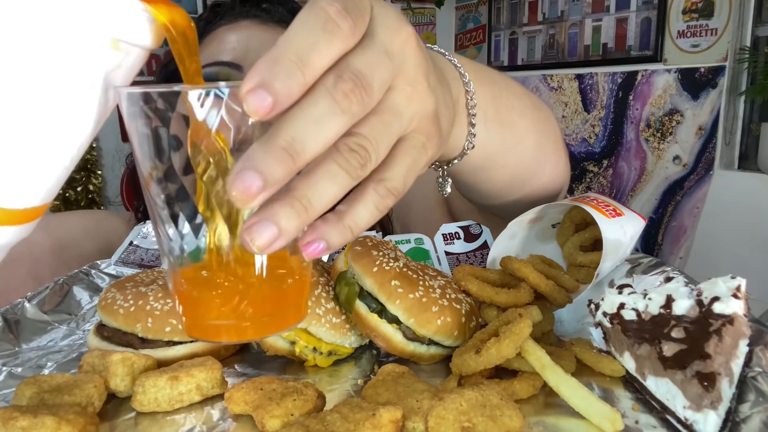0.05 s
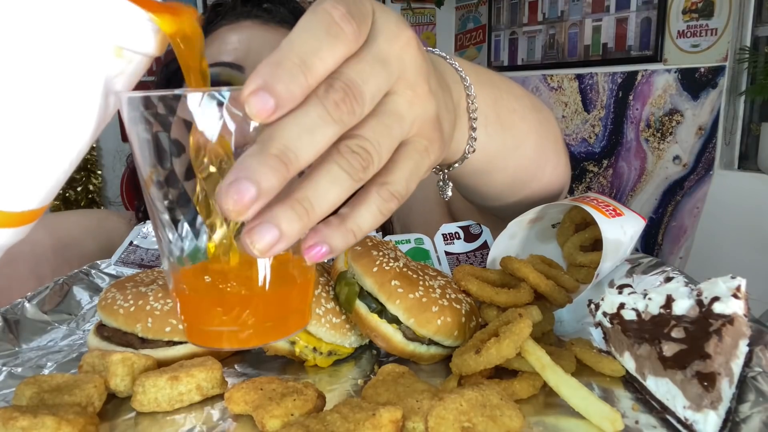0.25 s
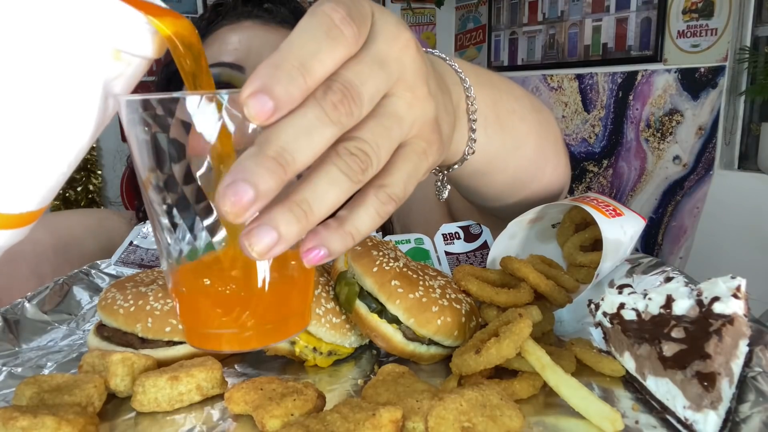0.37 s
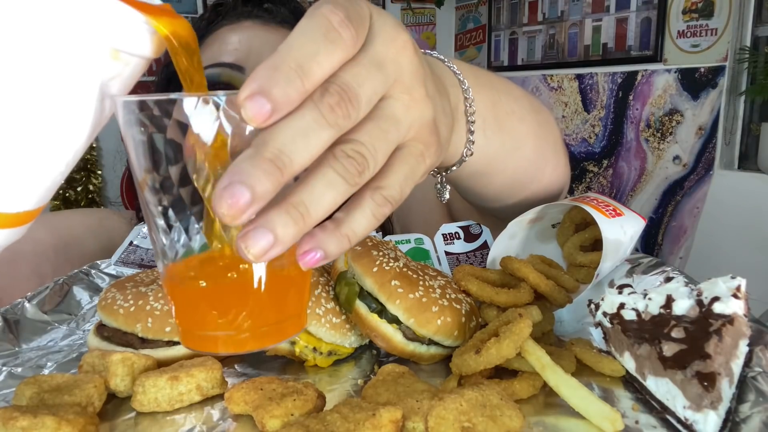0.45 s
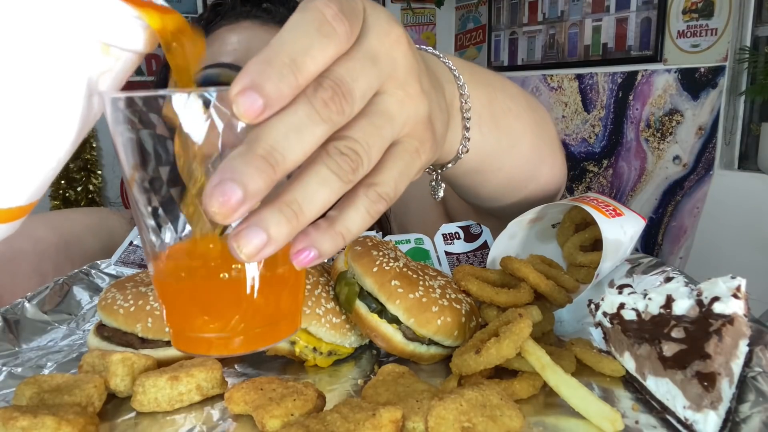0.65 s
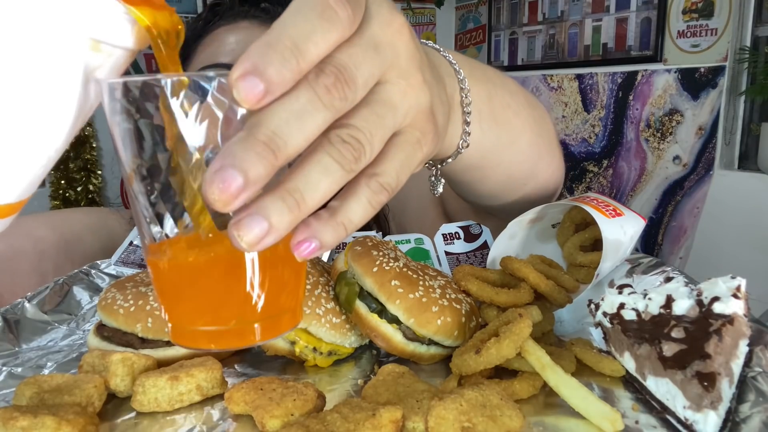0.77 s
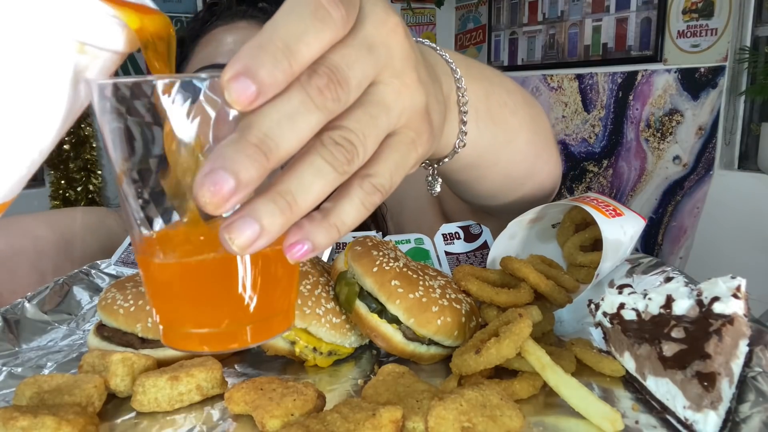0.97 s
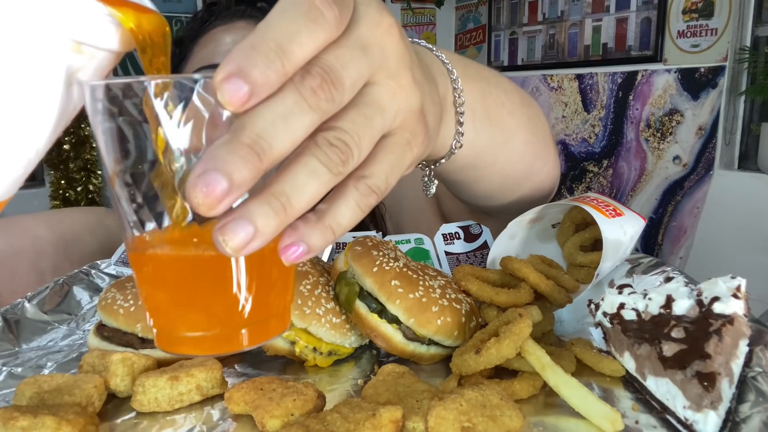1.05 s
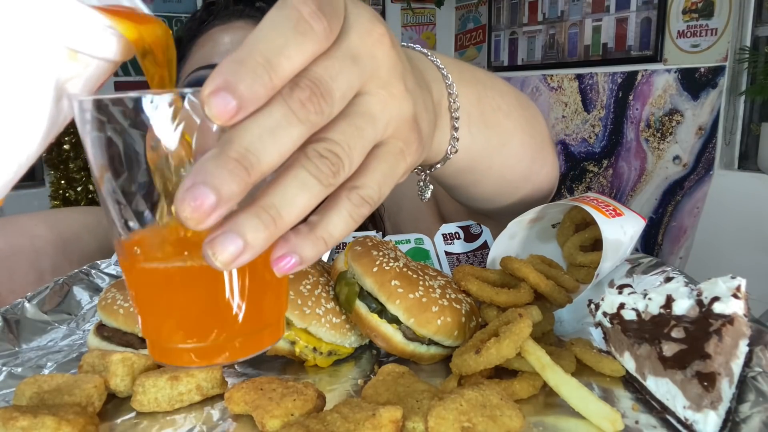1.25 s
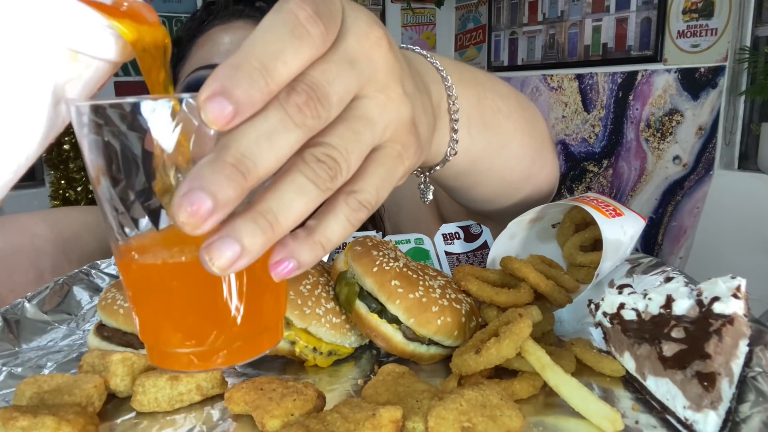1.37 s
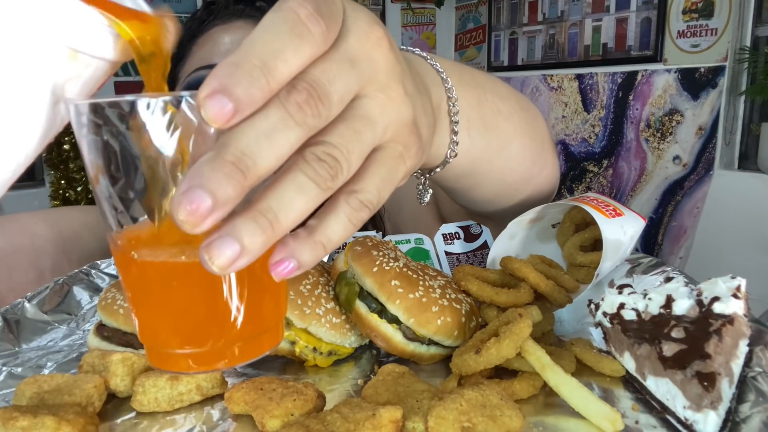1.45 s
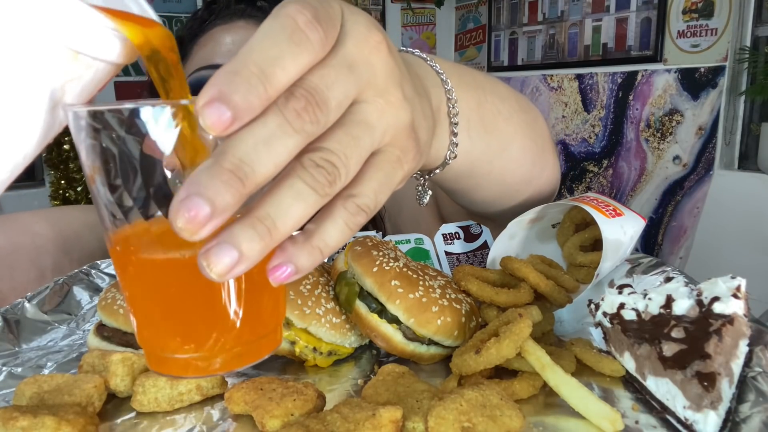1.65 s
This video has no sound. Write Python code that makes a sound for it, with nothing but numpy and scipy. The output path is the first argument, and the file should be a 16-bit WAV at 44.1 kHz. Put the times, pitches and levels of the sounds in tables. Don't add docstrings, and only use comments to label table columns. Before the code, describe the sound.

Soda streams into a plastic cup very close to the microphones: light crackles first, sharp bubbly splats, a hollow glug, then sparser drips and fading fizz, with a quiet motor drone in a small room.

```python
import sys
import numpy as np
from scipy import signal
from scipy.fft import rfft, irfft
from scipy.io import wavfile
from scipy.ndimage import uniform_filter1d

SR = 44100
rng = np.random.default_rng(int(sys.argv[2]) if len(sys.argv) > 2 else 0)


def unload_audio(sound):
    columns = np.transpose(np.atleast_2d(sound))
    steps = np.round(np.clip(columns, -1, 1) * 32767)
    wavfile.write(sys.argv[1], SR, steps.astype(np.int16))


def makeup_ratio(level_db):
    decades = np.asarray(level_db, float) / 20
    return 10 ** decades


N = 74970


def evened(x):
    return x / np.sqrt(np.mean(x ** 2) + 1e-20)


def read(points, hz):
    f, value = np.transpose(points)
    return np.interp(np.log(hz + 1), np.log(f + 1), value)


def add(mix, start_s, sound):
    part = mix[max(round(start_s * SR), 0):][:len(sound)]
    part += sound[:len(part)]


def coloured(x, points, size=4096):
    log_gain = np.log(makeup_ratio(read(points, abs(np.fft.fftfreq(size, 1 / SR)))))
    taps = np.fft.ifft(np.exp(np.conj(signal.hilbert(log_gain)))).real
    return signal.oaconvolve(x, taps[:size // 2])[:len(x)]


def resonate(x, hz, width):
    turn = np.exp(2j * np.pi * np.cumsum(hz * np.ones(len(x))) / SR)
    r = np.exp(-np.pi * width / SR)
    return 2 * (turn * signal.lfilter([1 - r], [1, -r], x / turn + 1e-18)).real


def splats():
    # (time [s], level [dB], ring pitch [Hz], treble [dB])
    lumps = [(0.0014, -25, 6000, -6), (0.064, -31, 3260, -9.5), (0.077, -28, 6900, -7.5),
             (0.098, -20, 3390, -13), (0.1361, -23.5, 4800, -12.5), (0.179, -25.5, 3330, -20),
             (0.218, -37, 3170, -1), (0.2276, -20, 6030, -9), (0.2425, -18.5, 5860, -7),
             (0.2666, -20.5, 3400, -10), (0.3007, -13.5, 1660, -4.5), (0.3048, -17, 4860, -10),
             (0.3077, -10, 3000, -7.5), (0.3319, -22, 2240, 0), (0.348, -20.5, 3700, -9),
             (0.409, -22, 6360, -4.5), (0.441, -16, 4000, -9.5), (0.4703, -19.5, 3430, -12),
             (0.5432, -21, 3310, -20.5),
             (0.5944, -23, 1730, -10), (0.613, -21.5, 3500, -13.5), (0.6648, -37.5, 1770, 3.5),
              (0.6976, -8, 2730, -12), (0.7104, -30, 1660, -21), (0.717, -32, 2580, 5.5),
              (0.7474, -30, 3330, -6), (0.7753, -20.5, 7060, -32), (0.786, -23.5, 2440, -15),
              (0.8021, -21.5, 3400, -17), (0.847, -14.5, 3700, -8), (0.8837, -27, 2250, -9),
              (0.9207, -32.5, 3320, -11), (0.9429, -26.5, 3500, -21), (0.9517, -29.5, 1410, -8),
              (0.9613, -29, 3160, -4.5), (0.978, -37, 3420, -12.5), (0.9976, -16.5, 7400, -9.5),
              (1.003, -25, 3760, -29), (1.0258, -24.5, 3400, -9),
             (1.0433, -32.5, 4030, -9), (1.1026, -28.5, 3670, -19), (1.1085, -36.5, 3500, -35),
            (1.127, -22.5, 6770, -6.5), (1.2025, -28, 2840, -19), (1.2287, -32.5, 3020, -8),
            (1.256, -34, 3080, -16), (1.3087, -13, 5260, -7), (1.354, -21, 4900, -15),
            (1.3757, -26.5, 6700, -1), (1.3987, -23.5, 1650, -7), (1.4226, -22, 6300, -11),
            (1.4728, -31, 3020, -15), (1.5074, -24, 2890, -9.5), (1.5759, -26.5, 3000, -17),
            (1.6007, -29, 3000, -15.5), (1.6109, -28, 2940, -17), (1.6954, -29.5, 2920, -35)]
    # (frequency [Hz], level [dB])
    body_colour = [(300, -51), (800, -6), (1500, -3.5), (3000, -3.5), (6000, -4.5), (8000, -14),
                   (11000, -24.5)]
    treble_colour = [(4000, -40.5), (7600, -2), (9400, -4), (11300, -13), (13500, -19), (15200, -17.5),
                     (16500, -35)]
    lead_s, rise_s, body_lag_s = 0.002, 0.0009, 0.001197
    crackle_db, patch_db = 5.27, 2.2
    ring_q, ring_db = 9, -7.5
    low_edge = 0.45

    body, treble, rings = np.zeros((3, N))
    t = np.arange(1800) / SR
    f = np.fft.rfftfreq(len(t), 1 / SR)
    rise = 1 - np.exp(-((t - lead_s).clip(0) / rise_s) ** 2)
    for s, db, hz, treble_db in lumps:
        length_s = 0.0051 * makeup_ratio(0.011 * (db + 27))
        shape = rise * (np.exp(-((t - lead_s) / length_s) ** 2) + 0.16 * np.exp(-t / 0.015))
        noise = rng.standard_normal((2, len(t)))
        flicker = uniform_filter1d(rng.standard_normal((2, len(t))), size=9) * 4.04
        bursts = noise * makeup_ratio(crackle_db * flicker) * shape
        patches = uniform_filter1d(rng.standard_normal((2, len(f))), size=25) * 5
        low_cut = np.sqrt(1 + (low_edge * hz / (f + 1)) ** 4)
        bursts = irfft(rfft(bursts) * makeup_ratio(patch_db * patches) / low_cut, len(t))
        low, high = (evened(burst) * np.sqrt(np.mean(shape ** 2)) for burst in bursts)

        start_s = s - lead_s
        add(treble, start_s, makeup_ratio(db + treble_db) * high)
        add(body, start_s + body_lag_s, makeup_ratio(db - 6.5) * low)
        ring = resonate(resonate(low, hz, hz / ring_q), hz, hz / 2)
        add(rings, start_s + body_lag_s, makeup_ratio(db - 12 + ring_db) * ring * np.std(low) / np.std(ring))
    return 2.13 * coloured(body, body_colour) + 3.92 * coloured(treble, treble_colour) + rings


def plops():
    # (time [s], level [dB], pitch [Hz], t60 [s])
    air_plops = [(0.003, -47.5, 798, 0.12), (0.101, -39.5, 1008, 0.069), (0.324, -31.5, 885, 0.065),
                 (0.573, -35, 1029, 0.075), (0.666, -34, 1020, 0.054), (0.7, -19, 1070, 0.063),
                 (0.718, -28.5, 1009, 0.033), (0.829, -37.5, 835, 0.041), (0.847, -36.5, 1058, 0.082),
                 (0.892, -29.5, 1026, 0.05), (0.917, -26, 936, 0.018), (1.17, -41, 921, 0.17),
                 (1.358, -44, 895, 0.36), (1.401, -29, 891, 0.079), (1.472, -53, 885, 0.12),
                 (1.61, -26, 1050, 0.0085)]
    # (time [s], level [dB], pitch [Hz], t60 [s])
    pings = [(.3085, -12.5, 4967, 0.029), (.3095, -23.5, 3100, .025), (.3085, -20.5, 2210, 0.053),
             (.334, -27, 4930, .03), (0.4425, -22.5, 3710, 0.018), (0.4699, -32, 3100, 0.022),
             (0.5972, -37, 1540, 0.032), (0.7009, -27, 1596, 0.09), (.7015, -18, 2893, 0.018),
             (.749, -34, 3220, 0.024), (0.8848, -45, 2270, 0.033), (0.9214, -49, 3180, 0.03),
             (.933, -34, 1140, .025), (0.965, -33, 3030, 0.024), (0.981, -36, 3200, 0.012),
             (0.998, -40, 1790, 0.045), (1.0029, -29.5, 3330, 0.035), (1.027, -33, 2960, 0.034),
             (1.049, -42.5, 1023, 0.038), (1.178, -40.5, 1488, 0.055), (1.2046, -32, 1906, 0.0089),
             (1.2307, -33, 3830, 0.016), (1.231, -31, 3140, 0.021), (1.243, -33, 3170, 0.016),
             (1.258, -40.5, 1760, 0.012), (1.258, -37, 3130, 0.019), (1.259, -37, 4130, 0.022),
             (1.291, -42, 3030, 0.017), (1.3105, -18.5, 6000, .015), (1.3813, -25, 5190, 0.015),
             (1.385, -33, 3060, .03), (1.398, -30, 2240, 0.05), (1.4728, -39.5, 1510, 0.034),
             (1.5085, -34.5, 3050, 0.043), (1.577, -40.5, 2920, 0.063), (1.6116, -30.5, 3000, 0.031),
             (1.6504, -41.5, 1485, 0.022)]
    # (time [s], level [dB], pitch [Hz])
    big_plops = [
        (0.357, -33.5, 692),
        (0.616, -38, 634),
        (0.716, -34, 719),
        (0.892, -37.5, 650),
        (0.917, -33, 614),
        (0.963, -34.5, 517),
        (1.527, -32.5, 516),
    ]
    # (time [s], level [dB], pitch [Hz])
    small_plops = [
        (0.2947, -41.5, 1360),
        (0.304, -13.5, 1520),
        (0.3339, -13, 1880),
        (0.5757, -35, 1840),
        (0.9536, -23, 1450),
        (1.1689, -32.5, 1450),
        (1.3998, -23.5, 1780),
    ]
    cycles = 23
    dying = [(*row, cycles / row[2]) for row in big_plops + small_plops]

    out, t = np.zeros(N), np.arange(6000) / SR
    for s, db, hz, t60 in air_plops + pings + dying:
        wobble = evened(uniform_filter1d(rng.standard_normal(len(t)), size=150))
        turns = np.cumsum(hz * (1 + 0.0038 * t / t60 + 0.032 * wobble)) / SR
        envelope = makeup_ratio(db - 60 * t / t60) * (1 - np.exp(-t / 0.00026))
        add(out, s, envelope * np.sin(2 * np.pi * turns))
    return out


def fizz():
    # (time [s], level [dB])
    swell = [
        (0, -39),
        (0.202, -57),
        (.33, -39.5),
        (.43, -46.5),
        (1.0, -42.5),
        (1.2, -51),
        (1.55, -45),
        (1.7, -54.5),
    ]
    # (frequency [Hz], level [dB])
    fizz_colour = [(300, -17), (900, 6), (2500, -25), (3100, -7), (7500, -9), (9400, -26), (12000, -21),
                   (15000, -35.5)]
    pops_per_s, spread_db, hiss_db = 1500, 3.5, -8
    low_hz, high_hz, kinds, pop_cycles = 874, 13600, 24, 5.4

    bursts = rng.random(N) < pops_per_s / SR
    size = makeup_ratio(spread_db * np.minimum(rng.exponential(1, N), 3.5)) * bursts
    kind = rng.integers(0, kinds, N)
    t, pops = np.arange(800) / SR, np.zeros(N)
    for k, hz in enumerate(np.geomspace(low_hz, high_hz, kinds)):
        u = t * hz / pop_cycles
        grain = u * np.exp(-2 * u) * np.sin(2 * np.pi * hz * t * (1 + 0.082 * u))
        pops += signal.oaconvolve(size * (kind == k), grain * hz / high_hz)[:N]
    clump = makeup_ratio(3 * evened(uniform_filter1d(rng.standard_normal(N), size=400)))
    x = clump * evened(pops) + makeup_ratio(hiss_db) * rng.standard_normal(N)
    s, db = np.transpose(swell)
    return makeup_ratio(np.interp(np.arange(N) / SR, s, db)) * evened(coloured(x, fizz_colour))


def cup(x):
    # (time [s], pitch [Hz])
    air_pitch = [
        (.9, 1017),
        (1.15, 875),
    ]
    # (frequency [Hz], width [Hz], level [dB])
    wall = [(3130, 97, -4.5), (4066, 1340, -9)]
    air_hz = np.interp(np.arange(N) / SR, *np.transpose(air_pitch))
    air = resonate(x, air_hz, 11)
    walls = sum(makeup_ratio(db + 9) * resonate(x, hz, width) for hz, width, db in wall)
    return x + makeup_ratio(-12) * air + walls


def room(x):
    # (frequency [Hz], t60 [s])
    decay = [(500, 0.38), (1500, 0.28), (4000, 0.14), (12000, 0.13)]
    taps = np.zeros((2, SR // 2))
    at = np.arange(200, SR // 2 - 20, 20)
    at = at + rng.integers(0, 20, (2, len(at)))
    np.put_along_axis(taps, at, rng.choice([-1., 1.], at.shape), 1)
    hz, t, z = signal.stft(taps, SR, nperseg=256)
    fading = z * makeup_ratio(-60 * t / read(decay, hz)[:, None])
    tail = signal.istft(fading, SR, nperseg=256)[1]
    return signal.fftconvolve(x[None], tail / np.linalg.norm(tail[0]), axes=1)[:, :N]


def ports(x):
    # (frequency [Hz], lead [rad])
    left_lead = [(1200, 0.), (2500, -.85), (4600, -1.9), (6400, .2), (7600, 2.0), (9400, 3.14),
                 (11900, 6.28), (14000, 8.8)]
    lead = np.interp(np.fft.rfftfreq(N, 1 / SR), *np.transpose(left_lead))
    return np.array([irfft(rfft(x) * np.exp(1j * lead), N), x])


def hum():
    # (frequency [Hz], level [dB])
    air_colour = [(25, -14), (45, -14), (90, -12.5), (120, -23.5), (230, -30.5), (420, -27), (700, -32)]
    # (time [s], pitch [Hz], level [dB])
    motor = [(0.0, 51, -58), (0.056, 50.3, -51.5), (0.178, 50, -61.5), (0.284, 52.4, -57), (0.378, 52, -62),
             (0.426, 52.6, -46), (0.568, 53.2, -55), (0.596, 54, -72), (0.68, 54, -48.5),
             (0.752, 55, -47.5), (0.828, 56.4, -62), (0.904, 57.3, -54.5), (1.369, 56, -55.5),
             (1.452, 49.8, -49.5), (1.548, 50.2, -48.5), (1.59, 50.4, -59)]
    air_db, same = -58.5, 0.65
    whine_hz, whine_db, whine_from_s = 226, -75.5, 0.76

    a, b = rng.standard_normal((2, N))
    pair = rfft([a, same * a + np.sqrt(1 - same ** 2) * b])
    pair = irfft(pair * makeup_ratio(read(air_colour, np.fft.rfftfreq(N, 1 / SR))), N)
    s, hz, db = np.transpose(motor)
    t = np.arange(N) / SR
    turn = 2 * np.pi * np.cumsum(np.interp(t, s, hz)) / SR
    drone_gain = makeup_ratio(np.interp(t, s, db) + np.array([[2.], [4.]]))
    drone = np.sin(turn + np.array([[0], [.6]])) * drone_gain
    fade_in = np.clip((t - whine_from_s) / 0.062, 0, 1)
    whine = makeup_ratio(whine_db) * fade_in * np.sin(2 * np.pi * whine_hz * t)
    return makeup_ratio(air_db) * evened(pair) + drone + whine


def scene():
    # (frequency [Hz], level [dB])
    bass_cut = [(150, -20), (330, -9), (480, -0.5)]
    # (frequency [Hz], level [dB])
    wide = [(300, -16), (1000, -12), (3000, -8), (6000, -8), (10000, -14)]
    bubbles = coloured(plops(), bass_cut)
    splash = cup(splats() + makeup_ratio(-5.5) * fizz() + makeup_ratio(-5.5) * bubbles)
    near, far = room(splash + makeup_ratio(-9) * bubbles)
    far = coloured(far, wide)
    return ports(splash + bubbles + makeup_ratio(-9.5) * near) + np.array([far, -far]) + hum()


def gated(x):
    gate_db, gate_hz = -20.5, 8100
    hz, t, z = signal.stft(np.array([x[0] + x[1], x[0] - x[1]]) / 2, SR, nperseg=1024)
    power = abs(z[:, :512]) ** 2
    bands = np.repeat(power.reshape(2, 32, 16, -1).mean(2), 16, axis=1)
    whole = uniform_filter1d(power[:, 40:190].mean((0, 1)), size=3)
    f = hz[:512, None]
    bands = bands * np.where(abs(f - 9300) < 1000, .2, 1)
    strong = bands > makeup_ratio(2 * gate_db) * whole + 2e-12
    keep = strong & (f < 16500) | (f < gate_hz)
    z = z * np.pad(keep, ((0, 0), (0, 1), (0, 0)))
    mid, side = signal.istft(z, SR, nperseg=1024)[1][:, :N]
    kept = np.array([mid + side, mid - side])

    edge_power = (np.diff(x, prepend=0) ** 2).sum(0)
    smooth = uniform_filter1d(edge_power, size=128) + 1e-12
    before = np.roll(uniform_filter1d(smooth, size=256), 220)
    jump_db = 10 * np.log10(abs(smooth / before))
    attack = uniform_filter1d(np.clip((jump_db - 8) / 4, 0, 1), size=128)
    whole_band = signal.oaconvolve(x, signal.firwin(21, 14000, fs=SR)[None], "same")
    return kept + attack * (whole_band - kept)


def low_pass(x):
    return signal.sosfilt(signal.butter(12, 16500, fs=SR, output="sos"), x)


def record(dry):
    return low_pass(gated(dry))


dry = scene()
out = record(dry)
unload_audio(out)
```